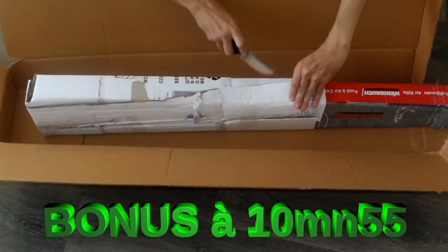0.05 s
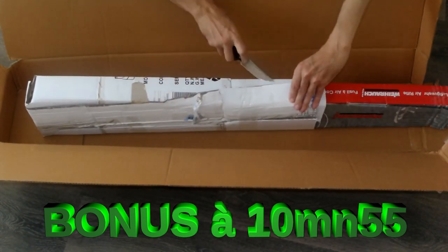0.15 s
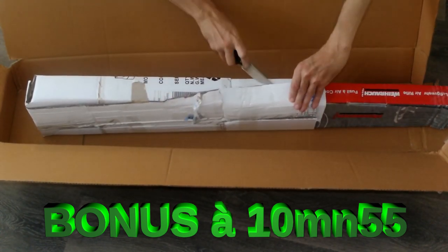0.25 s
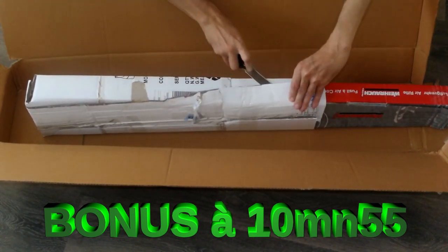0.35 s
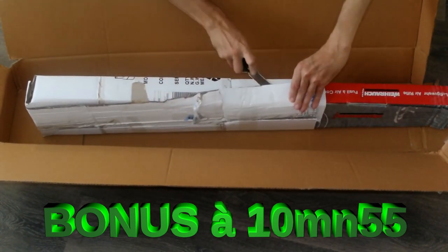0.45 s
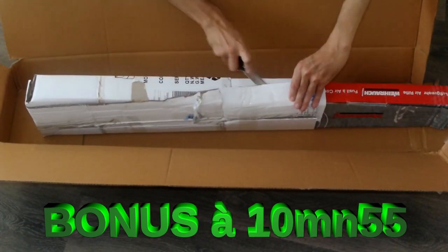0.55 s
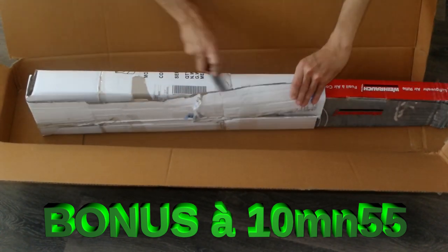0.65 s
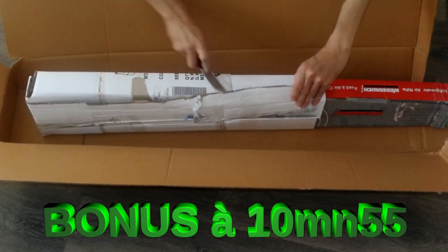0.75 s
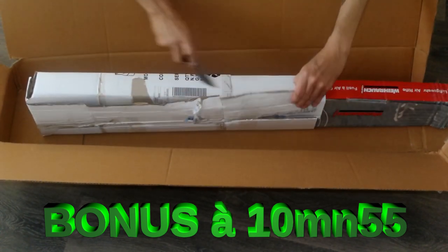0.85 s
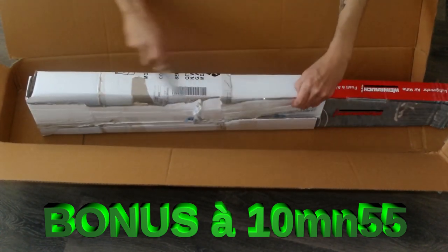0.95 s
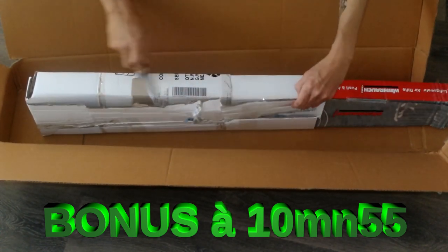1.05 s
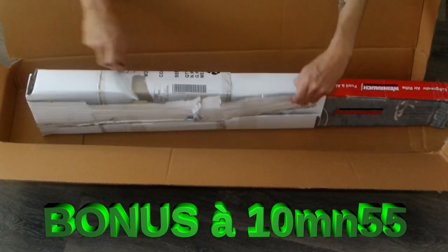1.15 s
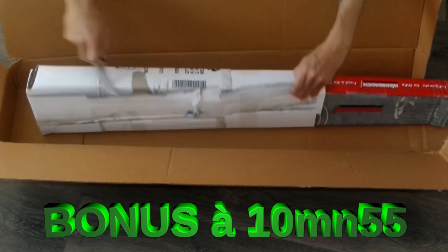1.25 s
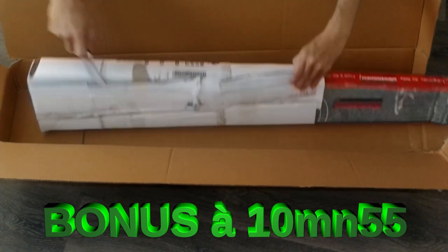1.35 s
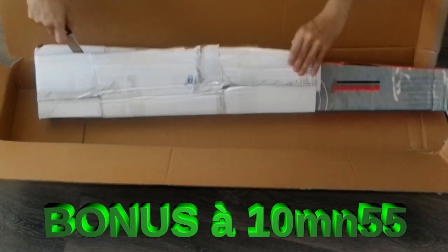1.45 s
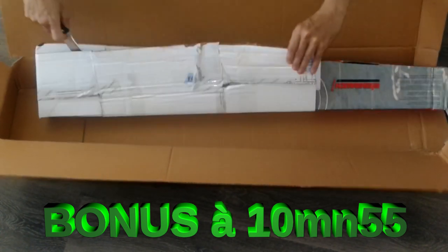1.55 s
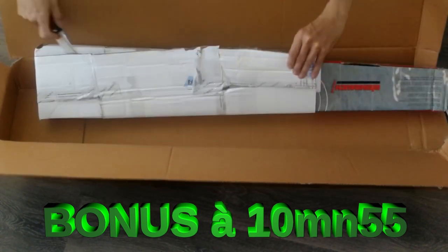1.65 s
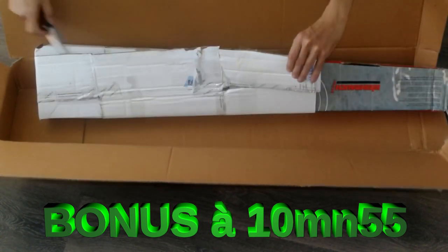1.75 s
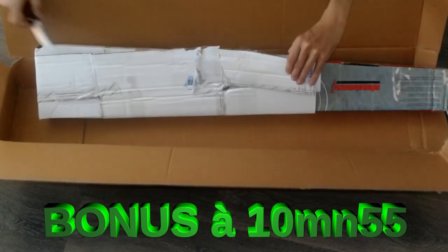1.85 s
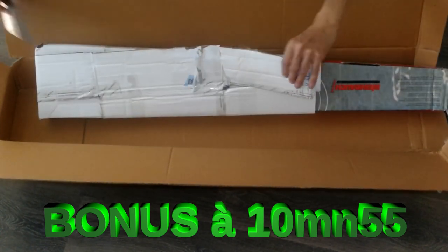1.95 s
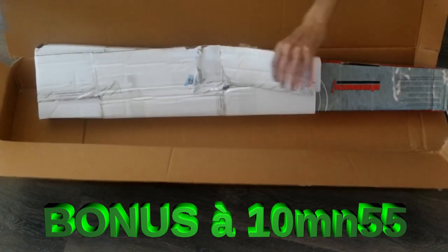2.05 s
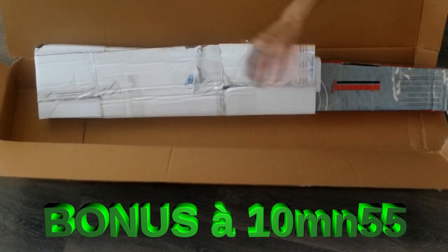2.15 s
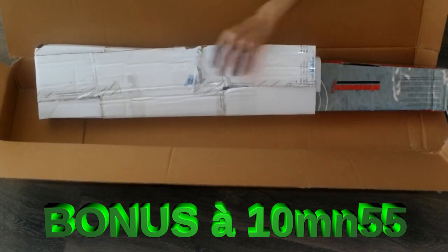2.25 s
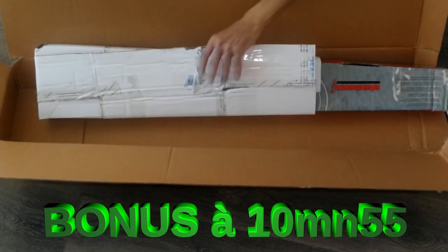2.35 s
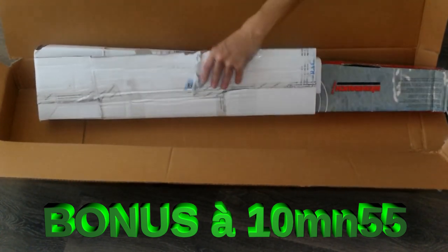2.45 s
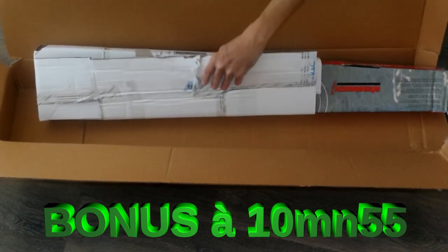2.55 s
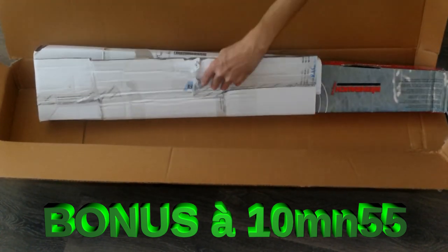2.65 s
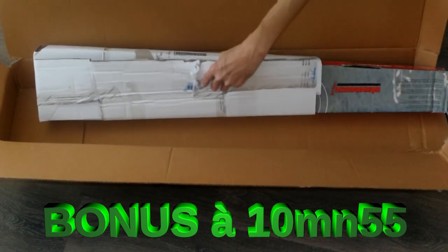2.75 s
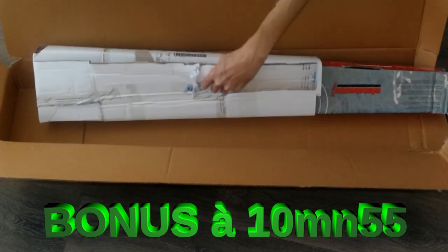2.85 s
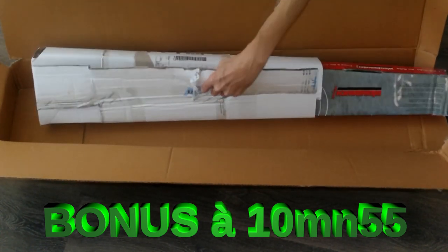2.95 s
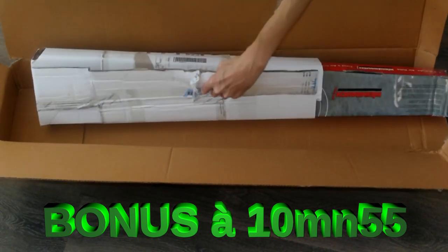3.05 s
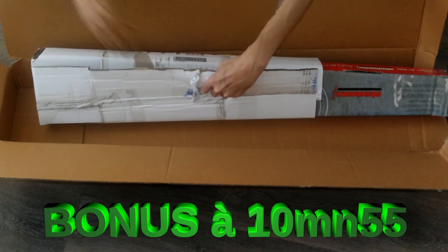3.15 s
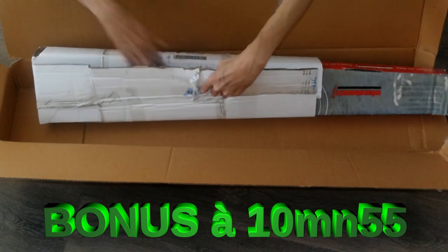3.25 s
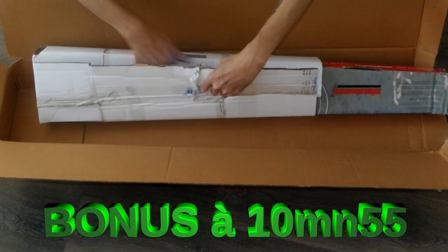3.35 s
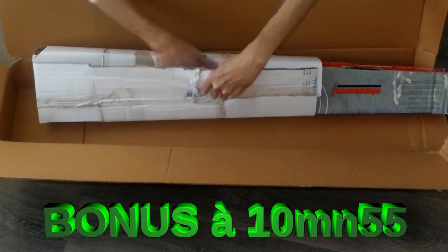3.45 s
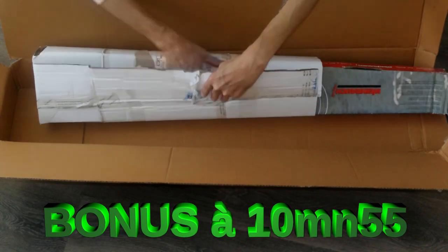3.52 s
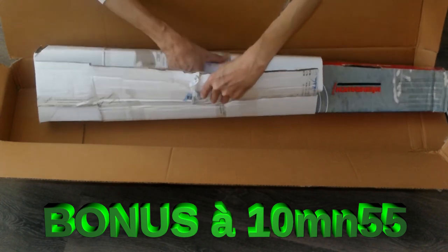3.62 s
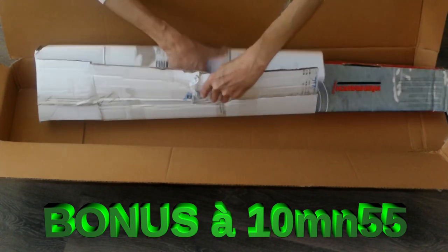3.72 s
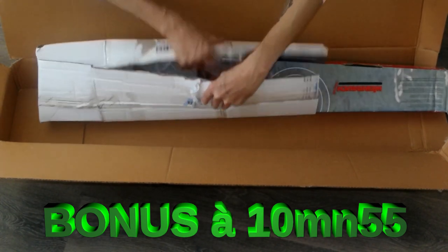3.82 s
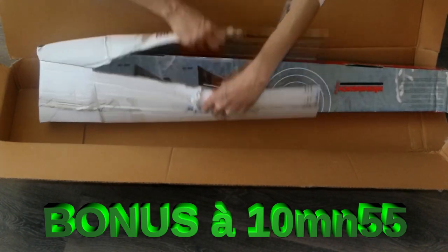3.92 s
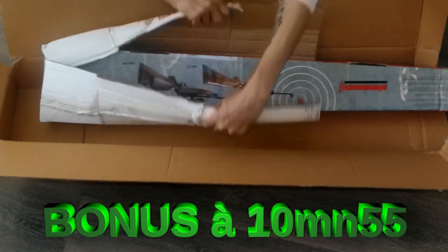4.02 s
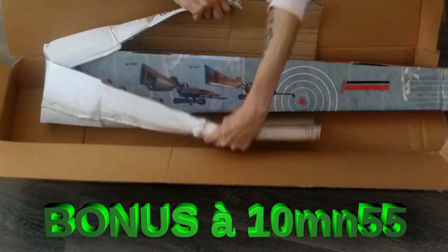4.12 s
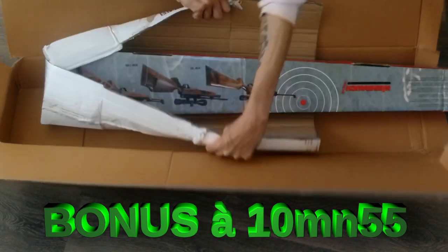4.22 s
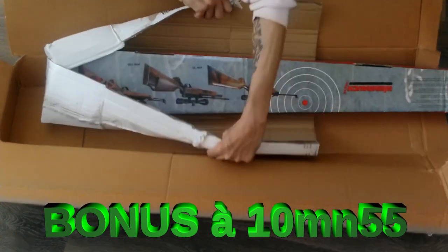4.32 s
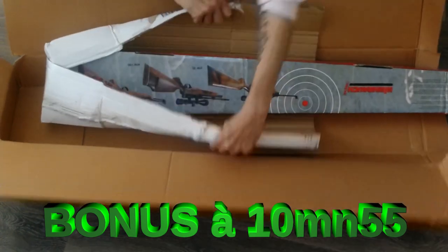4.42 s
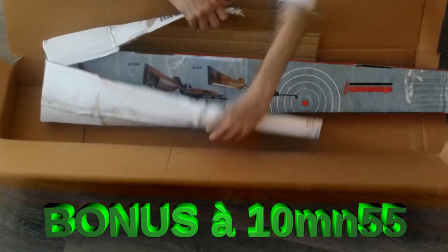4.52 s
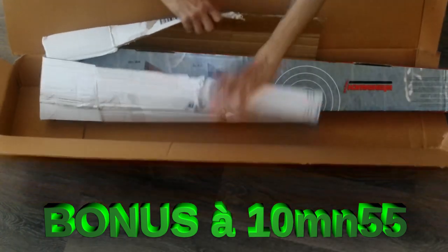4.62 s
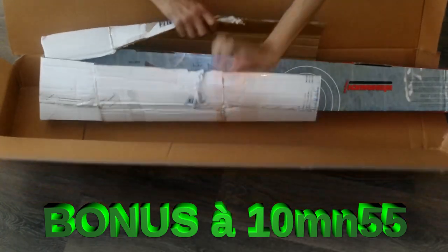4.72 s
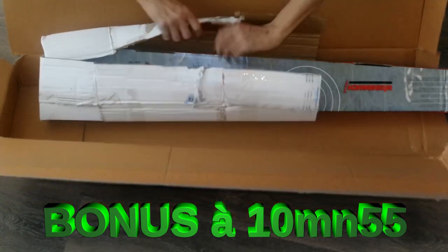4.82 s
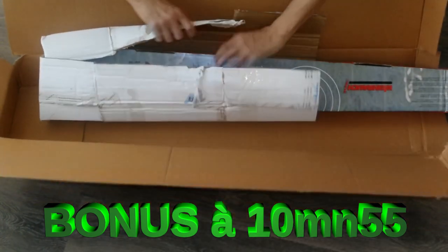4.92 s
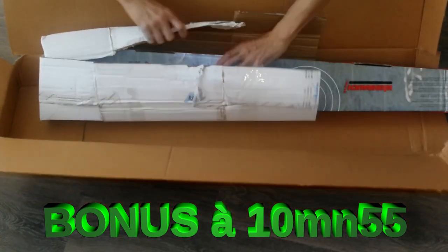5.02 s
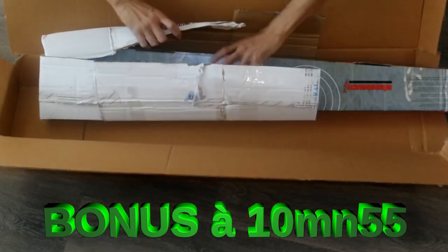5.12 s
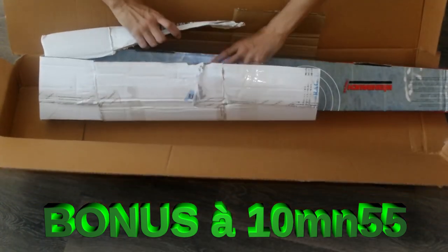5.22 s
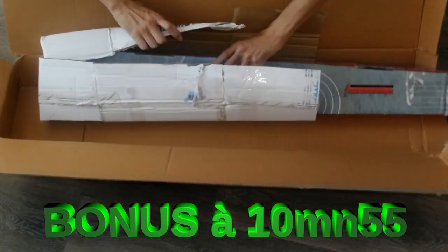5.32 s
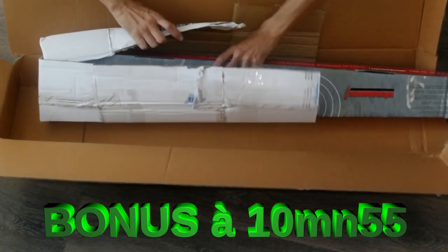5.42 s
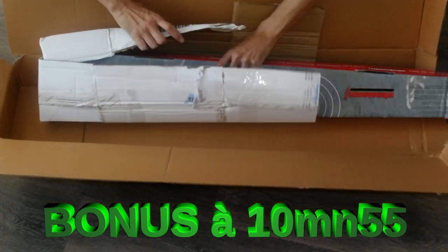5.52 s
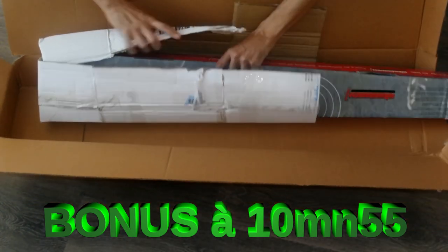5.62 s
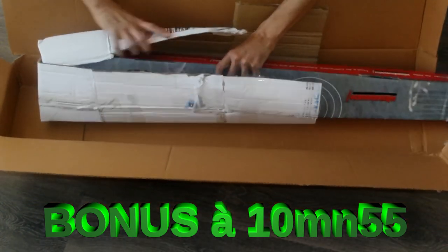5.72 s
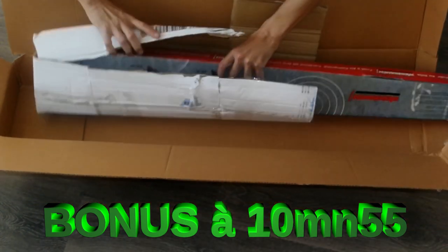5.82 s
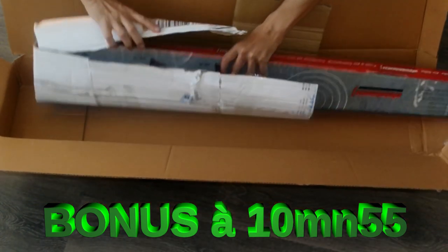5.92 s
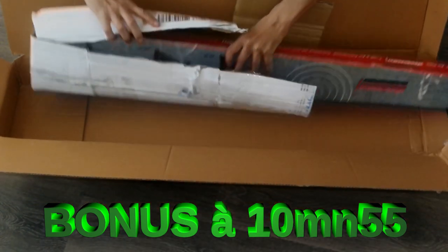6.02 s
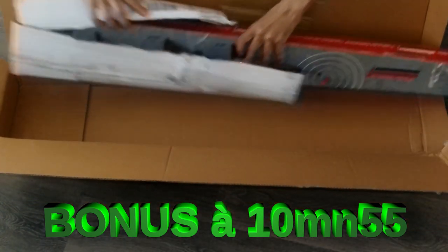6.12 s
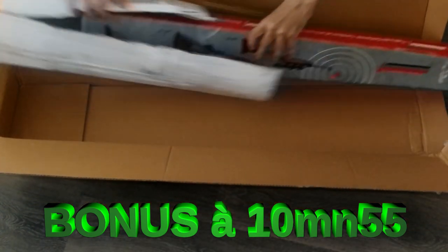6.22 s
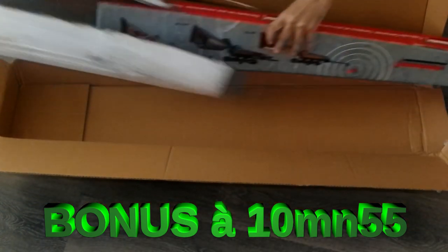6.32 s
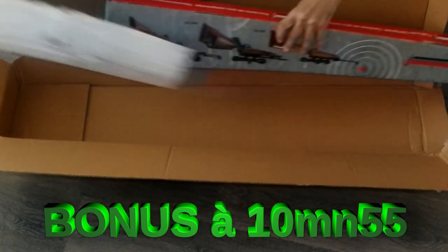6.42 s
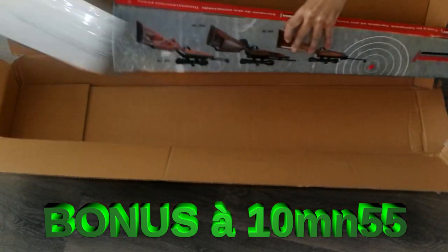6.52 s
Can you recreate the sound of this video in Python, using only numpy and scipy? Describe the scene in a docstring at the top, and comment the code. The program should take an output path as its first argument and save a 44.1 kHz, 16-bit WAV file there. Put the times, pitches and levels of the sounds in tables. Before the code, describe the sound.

In a bare, lightly echoing room, faint paper rustle gives way to a sharp snap as taped wrapping is slit. A long cardboard box drops with a hollow thud. Stiff paper rubs and groans briefly, then a hard crack and rip open it, followed by loud scraping, crinkling and small knocks as the wrapping is dragged about. Close microphone, quiet low room noise.

```python
"""Unwrapping a long cardboard box

A knife slits the thick paper wrapping of a long cardboard box that lies in an open carton, in a bare room.
The taped paper gives way with sharp snaps, the box drops back with a hollow thud, then hands rip the
wrapping open and drag it off, scraping and crinkling. Friction is random slips in clumps, coloured by the
sheet; snaps and blows are short noise bursts through resonators, the blows with ringing low sines.
All of these get a dense synthetic room tail, over a quiet noise floor."""
import sys
import numpy as np
from scipy import signal
from scipy.fft import rfft, irfft, next_fast_len
from scipy.io import wavfile
from scipy.ndimage import map_coordinates

SR = 44100
rng = np.random.default_rng(int(sys.argv[2]) if len(sys.argv) > 2 else 0)


def wav_record(signal):
    """Record a signal, one row per channel, as 16-bit PCM in the file named by sys.argv[1]."""
    frames = np.transpose(np.atleast_2d(signal))
    bounded = np.clip(frames, -1, 1)
    # unit amplitude maps onto the largest positive 16-bit level
    quanta = np.round(bounded * 32767).astype(np.int16)
    wavfile.write(sys.argv[1], SR, quanta)


N = 289869


def amp(db):
    """Decibels to gain."""
    return 10 ** (np.asarray(db) / 20)


def unit(x):
    """Scale to rms 1."""
    return x / np.sqrt(np.mean(x ** 2) + 1e-20)


def normed(x):
    """Scale to energy 1."""
    return x / np.linalg.norm(x)


def along(points, hz):
    """Interpolate (hz, value) points on a log frequency axis."""
    f, v = np.transpose(points)
    return np.interp(np.log(hz + 1), np.log(f), v)


def filtered(x, response):
    """Multiply the spectrum of x by a response of frequency."""
    m = next_fast_len(len(x) + 8192)
    hz = np.fft.rfftfreq(m, 1 / SR)
    return irfft(rfft(x, m) * response(hz), m)[:len(x)]


def coloured(x, spectrum):
    """Filter x by (hz, gain_db) points."""
    return filtered(x, lambda hz: amp(along(spectrum, hz)))


def resonance(f, centre, q):
    """Response of one damped resonator, gain 1 at its centre."""
    return 1j * f * centre / (q * (centre ** 2 - f ** 2) + 1j * f * centre)


def wobble(knots_per_s):
    """Smooth random curve through normally distributed knots."""
    knots = rng.standard_normal(int(N * knots_per_s / SR) + 4)
    return map_coordinates(knots, [np.arange(N) * knots_per_s / SR])


def add(track, start_s, x):
    """Mix x into the track at start_s."""
    start = max(round(start_s * SR), 0)
    track[start:start + len(x)] += x[:max(N - start, 0)]


# reverberation time of the room: hz, t60_s
ROOM_T60 = [(100, 0.46), (400, 0.48), (1500, 0.52), (5000, 0.46), (9000, 0.38), (15000, 0.46)]


def walls(build_s=0.0047, early_db=-11, count=6):
    """Room answer at energy 1, new each call: echoes off the carton's sides plus a dense decaying tail."""
    hz, t, z = signal.stft(rng.standard_normal(SR * 3 // 4), SR, nperseg=256)
    decay = amp(-60 * t / along(ROOM_T60, hz)[:, None])
    tail = signal.istft(z * decay, SR, nperseg=256)[1]
    tail = normed(tail * (1 - np.exp(-np.arange(len(tail)) / SR / build_s)))
    delays_s = rng.uniform(.001, .016, count)
    tail[(delays_s * SR).astype(int)] += amp(early_db) * rng.uniform(-0.61, 1, count)
    return normed(tail)


def in_room(x, wet_db):
    """Direct sound plus the walls' answer."""
    answer = amp(wet_db) * walls()
    answer[0] += 1
    return signal.fftconvolve(x, answer)


def burst(life_s, response, wet_db):
    """Dying noise puff, direct energy that of rms 1 held for life_s, plus an equally filtered room tail."""
    tail = normed(filtered(walls(), response))
    t = np.arange(len(tail)) / SR
    puff = rng.standard_normal(len(t)) * np.exp(-t / life_s)
    direct = normed(filtered(puff, response))
    return (direct + amp(wet_db) * tail) * np.sqrt(life_s * SR)


def slips(n, rate_per_s, spread_db):
    """Random impulses at random moments, sizes spread log-normally and clipped, at rms 1."""
    sizes = amp(spread_db * np.clip(rng.standard_normal(n), -2, 2)) * rng.choice([-1, 1], n)
    return unit(sizes * (rng.random(n) < rate_per_s / SR))


def friction(spectrum, rate_per_s, spread_db, judder_db, wet_db, count=2):
    """Stick-slip at several spots, at rms 1: slips clump with a shared grip and the room blurs them."""
    grip = amp(judder_db * np.tanh(wobble(70)) + judder_db * np.tanh(wobble(400)))
    spots = np.zeros(N)
    for _ in range(count):
        spot = slips(N, rate_per_s / count, spread_db) * grip
        spots += in_room(spot, wet_db)[:N]
    return unit(coloured(spots, spectrum))


RELEASE_DB_PER_S = 136


def stroke(start_s, rise_s, length_s, swell_db):
    """Gain of one hand movement: linear take-hold, even dB swell or fade, then release."""
    t = np.arange(N) / SR - start_s
    swell = swell_db * np.clip(t / length_s, 0, 1)
    release = RELEASE_DB_PER_S * np.maximum(t - length_s, 0)
    return np.clip(t / rise_s, 0, 1) * amp(swell - release)


UNEVEN_DB, UNEVEN_KNOTS_PER_S = 0.86, 22  # the pull is never quite steady


def effort(strokes):
    """Power-summed stroke gains: the level first, then one gain per column set against it."""
    power = 0
    for start_s, rise_s, length_s, level_db, swell_db, *offsets_db in strokes:
        gains = amp(level_db + np.array([0, *offsets_db]))[:, None]
        power = power + (gains * stroke(start_s, rise_s, length_s, swell_db)) ** 2
    return np.sqrt(power) * amp(UNEVEN_DB * wobble(UNEVEN_KNOTS_PER_S))


# background noise colour: hz, gain_db
AMBIENCE_COLOUR = [(12, -50), (20, -3), (70, -10), (122, -7), (207, -8.5), (289, -8.5), (581, -16),
                   (631, -15.5), (1010, -23), (1100, -21.5), (2210, -30), (15500, -36.5)]


def ambience():
    """Steady room floor: noise weighted to the low end."""
    return amp(-58) * unit(coloured(rng.standard_normal(N), AMBIENCE_COLOUR))


def crinkle(rate_per_s, spread_db):
    """Creases popping at rms 1, each a damped sine ringing a few cycles at its own pitch."""
    out, t = np.zeros(N), np.arange(256) / SR
    for when, pitch, size in rng.random((int(rate_per_s * N / SR), 3)):
        hz = 2000 * 6 ** pitch
        pop = np.sin(2 * np.pi * hz * t) * np.exp(-t * hz / 2) * np.sqrt(hz)
        add(out, when * N / SR, amp(spread_db * size ** 2) * pop)
    return unit(in_room(out, wet_db=0)[:N])


# drags of the wrapping: start_s, rise_s, length_s, level_db, swell_db (over the stroke),
# hiss_re_level_db, flap_re_level_db
DRAGS = [(0, 0.0018, 0.15, -57.5, -15.5, 1, -12), (.40, 0.0074, 0.51, -68.5, 9.5, -3, -2),
         (.92, .02, 0.21, -47, -7, -1.5, -18), (1.19, 0.033, .18, -50.5, -10, -2.5, -1),
         (1.432, 0.022, 0.13, -50, -2.5, -9, -7), (1.95, 0.013, 0.056, -49.5, -1, -3, -8),
         (2.06, 0.054, 0.29, -53.5, -7.5, 6.5, 0.5), (2.385, .01, 0.2, -55.5, -1, -3, 0.5),
         (3.41, .01, 0.14, -72.5, 1, 7.5, -9), (3.585, .01, 0.13, -59, -4.5, -6.5, -6.5),
         (3.72, 0.022, 0.1, -54, 18, -8, -23), (3.95, 0.032, 0.23, -43, 2.5, -3.5, -8.5),
         (4.15, 0.016, .36, -38.5, 3.5, -7.5, -14), (4.53, 0.025, 0.52, -43, -17, -2.5, -8),
         (4.97, 0.0041, 0.25, -49, 0.5, -5.5, -2.5), (5.35, .13, 0.16, -49.5, 5, -3.5, -7.5),
         (5.55, 0.028, 0.28, -55, -1, -12, -4), (5.72, 0.055, 0.64, -53.5, 1, -5.5, -11.5),
         (5.85, 0.045, 0.047, -46, 0, -2.5, -6), (6.1, 0.074, 0.31, -48.5, -2, 2.5, -3.5),
         (6.47, 0.018, 0.28, -55, -7, -31, -4)]
# friction colours of flapping sheet, drumming sheet, rasping edges, smooth faces: hz, gain_db
FLAP_COLOUR = [(45, -28.5), (80, -2.5), (98, 2.5), (125, -4.5), (160, 0.5), (205, 3), (260, -1.5),
               (400, -28.5)]
DRUM_COLOUR = [(130, -38), (230, -12.5), (300, 1.5), (365, 4), (430, 3), (510, 2), (660, -1.5), (800, -5),
               (1000, -25.5), (1800, -48.5)]
RASP_COLOUR = [(400, -50), (650, -5.5), (900, 2), (1300, -1), (2000, -3), (3200, -4), (4200, -16.5),
               (8000, -53)]
HISS_COLOUR = [(2000, -49), (3400, -5), (4300, -3.5), (5400, -3), (6500, -1.5), (8500, -5), (11500, -1.5),
               (13000, -3.5), (15500, -20)]
RASP_DB, RASP_HISS_SHARE = -4.5, 0.26  # share 0 follows the drumming, 1 the hiss
CREASE_RE_HISS_DB = -7


def sliding():
    """The dragged sheet flaps, drums at low resonances, rasps over edges, hisses on smooth faces."""
    pull, hissing, flapping = effort(DRAGS)
    rasping = amp(RASP_DB) * pull ** (1 - RASP_HISS_SHARE) * hissing ** RASP_HISS_SHARE
    flap = flapping * friction(FLAP_COLOUR, rate_per_s=400, spread_db=0.5, judder_db=4, wet_db=-4)
    drum = pull * friction(DRUM_COLOUR, rate_per_s=700, spread_db=5, judder_db=3, wet_db=3)
    rasp = rasping * friction(RASP_COLOUR, rate_per_s=900, spread_db=3.5, judder_db=1, wet_db=3)
    hiss = hissing * friction(HISS_COLOUR, rate_per_s=4000, spread_db=12, judder_db=5.5, wet_db=8.5)
    creases = hissing * amp(CREASE_RE_HISS_DB) * crinkle(rate_per_s=60, spread_db=6.5)
    return flap + drum + rasp + hiss + creases


# bursts of tearing and scraping; the one at 0.745 s is a short bright hiss near 11.5 kHz:
# start_s, length_s, level_db (before trim and colour), centre_hz
BURSTS = [(0.514, 0.012, -47.5, 7000), (0.608, .025, -44.5, 10000), (0.666, 0.018, -29.5, 3250),
          (0.721, 0.033, -45, 2200), (0.745, 0.021, -19.5, 11500), (1.54, 0.088, -39.5, 3180),
          (1.567, 0.039, -32, 7520), (2.604, 0.097, -42, 5470), (2.659, .07, -44.5, 1190),
          (3.796, 0.0042, -23, 5900), (3.819, 0.031, -23.5, 7500), (4.156, 0.026, -32.5, 1400)]
# fibres and tape giving way: start_s, level_db (before trim and colour), centre_hz, sharpness_q
SNAPS = [(.1, -52, 5500, 1), (.147, -47.5, 5500, 1), (.512, -44.5, 4000, 0.73), (0.7045, -14.5, 2900, .6),
         (0.7153, -13, 4000, 1.9), (0.7162, -20.5, 1350, 5), (0.7174, -14.5, 1910, 3.2),
         (0.7214, -14, 4240, 2.6), (1.452, -53, 3000, 0.4), (1.547, -44, 3500, .6),
         (1.5966, -24.5, 7400, 0.29), (1.6002, -19, 6800, 0.56), (1.905, -46, 5000, 0.6),
         (1.936, -37.5, 6300, 6), (1.977, -37, 9000, 0.75), (2.078, -40, 9000, 0.52),
         (2.53, -38.5, 6630, 8), (2.6, -29.5, 5600, 2.6), (2.733, -34, 10000, 0.76),
         (2.786, -38, 6840, 0.51), (3.058, -44, 8000, 1), (3.8056, -13.5, 6500, 10),
         (3.8072, -14.5, 2300, 0.85), (4.063, -29, 5000, 2), (4.164, -27.5, 9700, 1.6),
         (4.224, -31, 4830, 2.1), (4.2575, -31.5, 7600, 2.3), (4.3227, -27.5, 7450, 3),
         (4.98, -35, 1990, .5), (5.367, -45.5, 3200, 0.45), (5.887, -35, 4530, 1.3)]
# colour of all bursts and snaps: hz, gain_db
PAPER_COLOUR = [(100, -16), (500, 13), (1000, 3), (1600, -1), (3000, -2.5), (5300, -5), (6500, -2.5),
                (8500, -6), (11500, -2.5), (13000, -6.5), (15500, -25)]
BURST_TRIM_DB, SNAP_TRIM_DB = -7.5, 1.0


def bursts_and_snaps(count=3):
    """A burst is a run of small random impulses; a snap is one big puff, ringing a stiff patch of paper."""
    out = np.zeros(N)
    for start_s, length_s, level_db, centre_hz in BURSTS:
        n = int(length_s * SR)
        gain = amp(level_db + BURST_TRIM_DB) / np.sqrt(count)
        for _ in range(count):
            impulses = np.pad(slips(n, rate_per_s=1700, spread_db=8.5), (0, n))
            run = unit(filtered(impulses, lambda f: resonance(f, centre_hz, q=0.69)))
            add(out, start_s, in_room(gain * run, wet_db=4.5))
    for start_s, level_db, centre_hz, q in SNAPS:
        snap = burst(life_s=0.0017, response=lambda f: resonance(f, centre_hz, q), wet_db=-2)
        add(out, start_s, amp(level_db + SNAP_TRIM_DB) * snap)
    return coloured(out, PAPER_COLOUR)


# blows on the cardboard: start_s, level_db (before bass cut), centre_hz, ring_re_level_db (before trim)
KNOCKS = [(0.274, -53, 262, -6.5), (0.7162, -26, 200, -15), (0.718, -27, 596, -9), (1.523, -37.5, 378, -7),
          (1.563, -23.5, 230, -14), (1.578, -28.5, 104, -3), (1.583, -27, 430, -13.5),
          (1.905, -44.5, 402, -20), (1.972, -44, 530, -14), (3.808, -16.5, 425, -28),
          (3.846, -25.5, 346, -19), (4.164, -31, 222, -12), (4.44, -37, 259, -15), (4.627, -31, 236, -23),
          (4.978, -35.5, 423, -14), (5.21, -42.5, 300, -12), (5.448, -41, 410, -15),
          (6.400, -40.5, 423, -32)]
# low resonances of carton and room: hz, level_db (before weighting by nearness to the blow), t60_s
BOOM = [(101.5, -1.5, 0.48), (203.6, -5, 0.56), (317.7, 1, 0.43), (354, -2, 0.33), (497, -0.5, 0.3),
        (543, -19.5, 0.71), (669, -1.5, 0.43)]
RING_TRIM_DB, RING_RISE_S = 8, 0.0017


def knocks():
    """Each blow bends a cardboard panel, which dies fast and wakes the nearby low resonances."""
    out, t = np.zeros(N), np.arange(SR) / SR
    for start_s, level_db, centre_hz, ring_db in KNOCKS:
        blow = burst(life_s=0.0084, response=lambda f: resonance(f, centre_hz, q=1.18) ** 2, wet_db=3)
        add(out, start_s, amp(level_db) * blow)
        ring = np.zeros(len(t))
        for hz, mode_db, t60_s in BOOM:
            nearness = abs(resonance(hz, centre_hz, q=1.0))
            ring += nearness * amp(mode_db - 60 * t / t60_s) * np.sin(2 * np.pi * hz * t)
        ring *= 1 - np.exp(-t / RING_RISE_S)
        add(out, start_s, amp(level_db + ring_db + RING_TRIM_DB) * ring)
    # a small panel radiates little deep bass
    return coloured(out, [(45, -14), (85, -3)])


# shoves of the wrapping along the box: start_s, rise_s, length_s, groan_db, swell_db (over the stroke),
# hiss_re_groan_db
SHOVES = [(2.575, 0.028, 0.074, -48.5, 2.5, -5), (2.652, 0.0064, 0.052, -32, -5.5, -23),
          (2.77, .03, 0.078, -46, 1.5, -7), (2.915, 0.023, 0.076, -39, -2, -20.5)]
# colour of the hollow groan: hz, gain_db
GROAN_COLOUR = [(110, -14.5), (250, -9.5), (340, -7), (450, 0.5), (620, 0.5), (880, -5), (1100, -4.5),
                (1300, -5.5), (1650, -16), (3000, -16), (4500, -30.5)]


def pushing():
    """Pressed hard, the stiff wrapping chatters on the box with a hollow groan."""
    groaning, hissing = effort(SHOVES)
    groan = groaning * friction(GROAN_COLOUR, rate_per_s=450, spread_db=2, judder_db=1.5, wet_db=3.5)
    hiss = hissing * friction(HISS_COLOUR, rate_per_s=1300, spread_db=6, judder_db=14, wet_db=1)
    return groan + hiss


def scene():
    """Paper and box over the quiet floor of the room, one channel."""
    return (ambience() + sliding() + bursts_and_snaps() + knocks() + pushing())[None]


TOP_HZ = 15800


def record(dry):
    """Remove everything at and above the band limit."""
    return np.array([filtered(channel, lambda hz: hz < TOP_HZ) for channel in dry])


dry = scene()
out = record(dry)
wav_record(out)
```